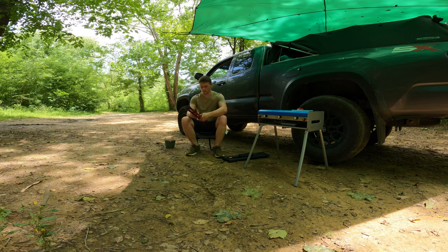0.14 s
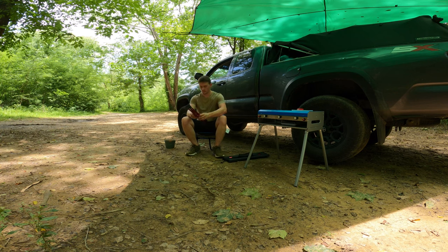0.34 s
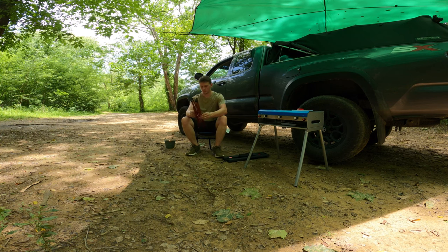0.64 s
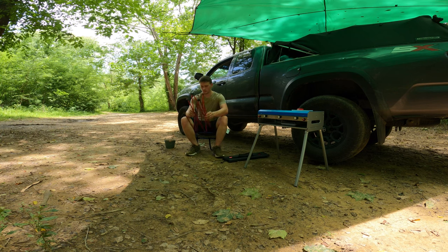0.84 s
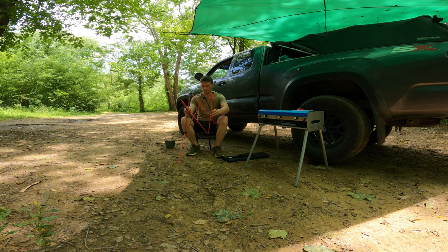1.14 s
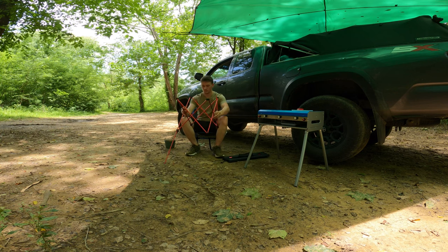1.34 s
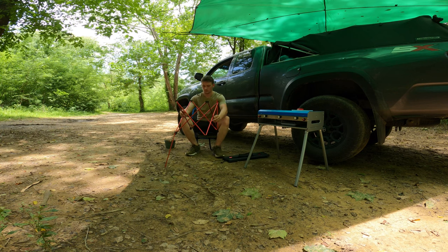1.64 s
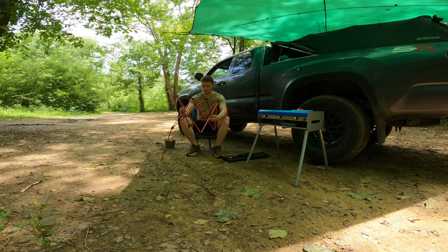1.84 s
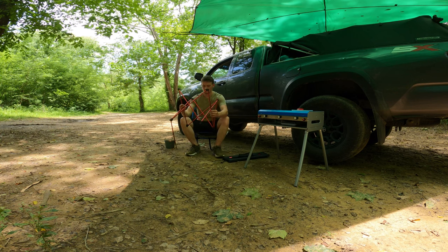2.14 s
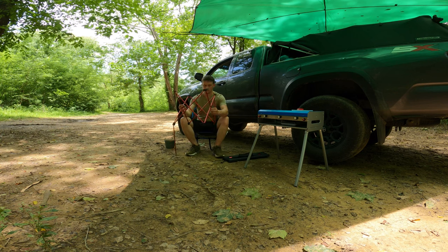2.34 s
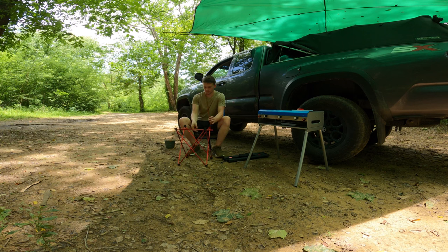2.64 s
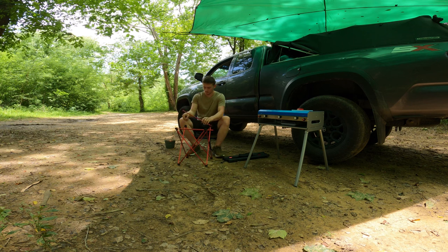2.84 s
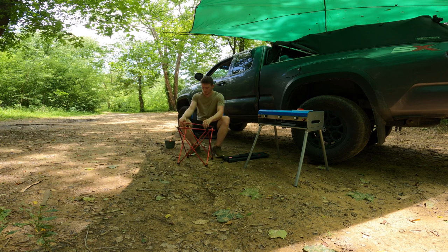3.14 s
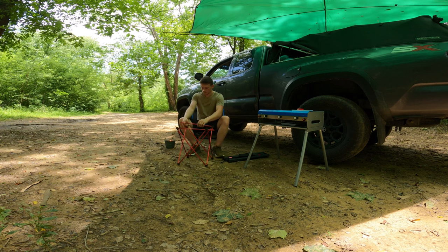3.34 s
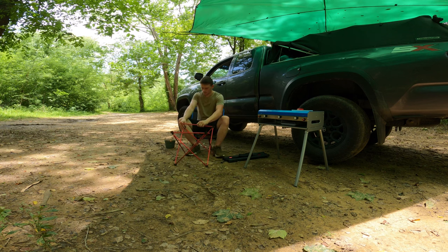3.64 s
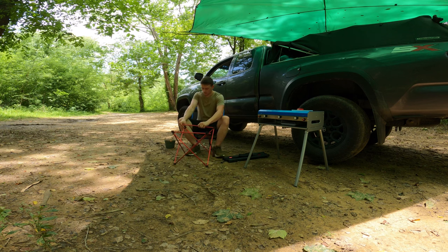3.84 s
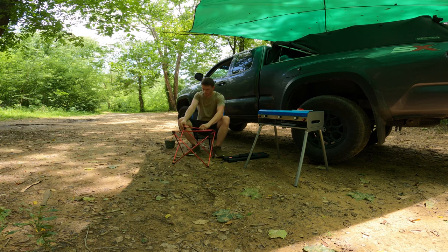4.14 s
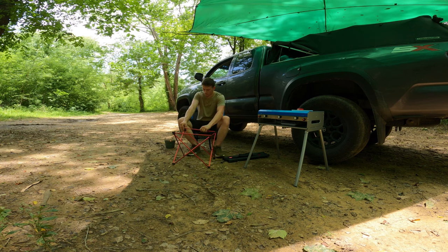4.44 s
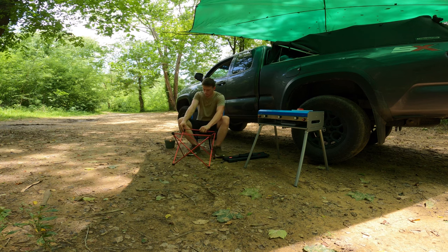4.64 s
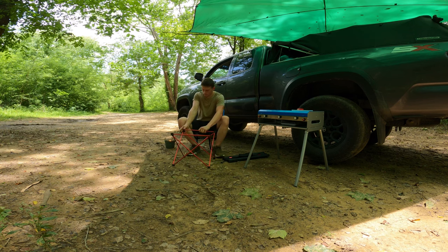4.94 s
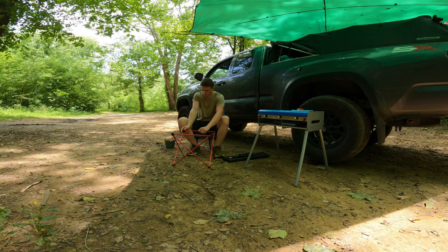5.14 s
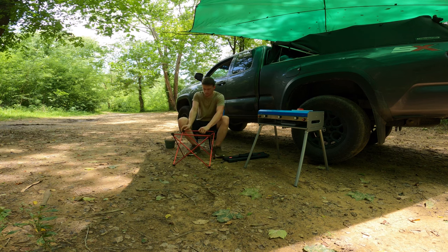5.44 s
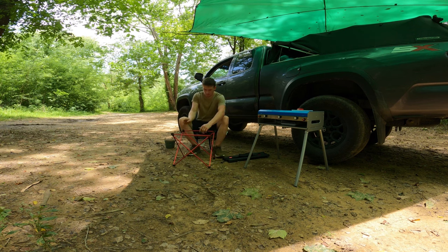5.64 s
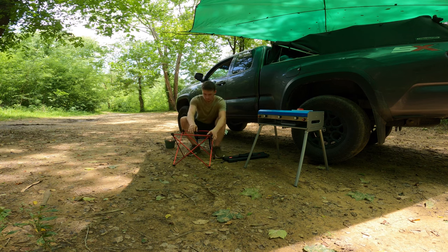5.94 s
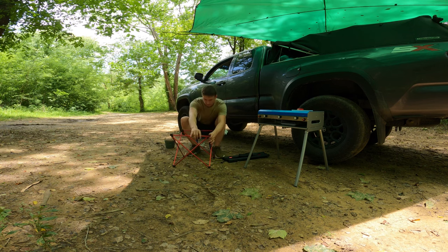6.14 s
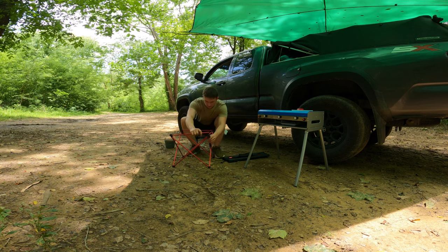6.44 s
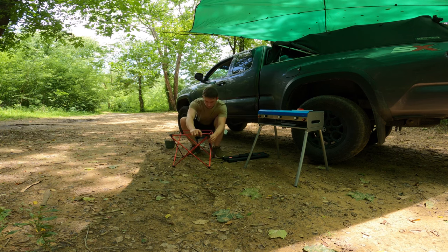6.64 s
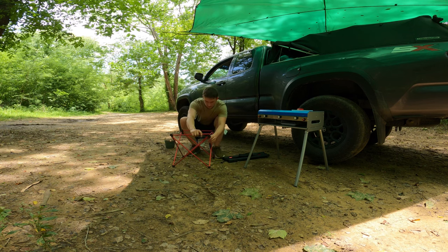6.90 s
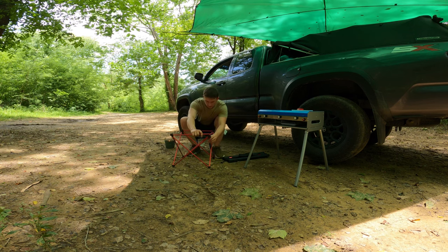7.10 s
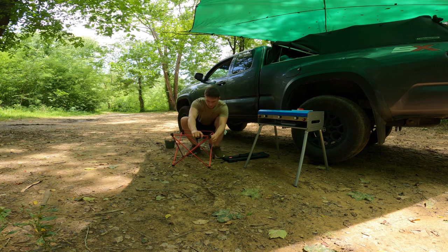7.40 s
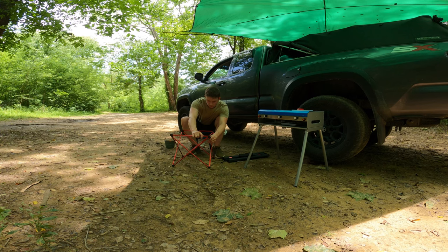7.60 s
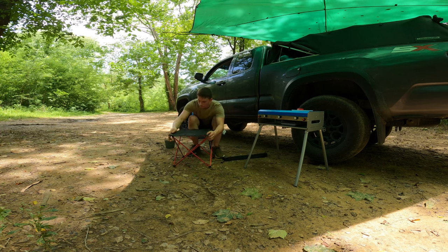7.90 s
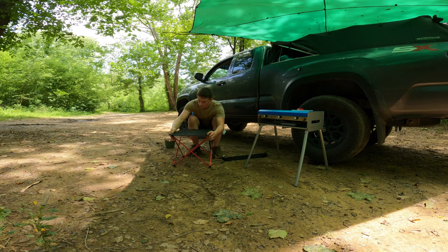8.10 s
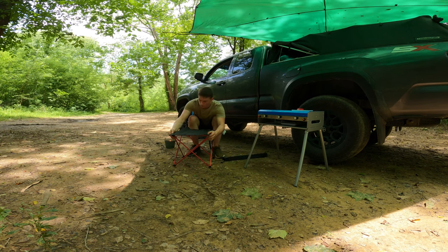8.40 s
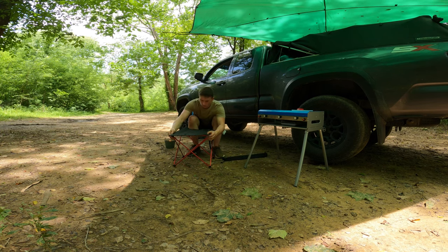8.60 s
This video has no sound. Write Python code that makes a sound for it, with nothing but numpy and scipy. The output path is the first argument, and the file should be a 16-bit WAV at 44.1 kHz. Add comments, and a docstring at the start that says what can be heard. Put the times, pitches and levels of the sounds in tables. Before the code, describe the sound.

Aluminium camp table tubes click and snap together in a quiet woodland clearing, birds whistling far off, ending with a heavy fabric-top snap.

```python
"""Folding table in a forest clearing

A folding table of aluminium tubes is snapped together in a clearing: impacts excite broadband clicks,
a tube chimes in its bending modes, and the top snaps on and shudders. Hands and cloth rub as shaped noise.
A parked truck and the trees return echoes; songbirds whistle far off as gliding sines, and insects drone.
A steady hush and a soft, swelling low rumble, both filtered noise, lie beneath.
"""
import sys
import numpy as np
from scipy import signal
from scipy.fft import rfft, irfft, next_fast_len
from scipy.io import wavfile

SR = 44100
rng = np.random.default_rng(int(sys.argv[2]) if len(sys.argv) > 2 else 0)


def bounce(signal):
    """Save signal as a 16-bit WAV file at the path given by the first command-line argument."""
    frames = np.transpose(np.atleast_2d(signal))
    limited = np.clip(frames, -1, 1)
    pcm = np.round(limited * 32767).astype(np.int16)
    wavfile.write(sys.argv[1], SR, pcm)


N = 386316


def amp(db):
    """Logarithmic level: decibels become a linear amplitude gain."""
    return 10 ** (np.asarray(db) / 20)


def unit(x):
    """Normalisation: scales a signal to a root-mean-square of one."""
    return x / np.sqrt(np.mean(x ** 2) + 1e-20)


def read(points, hz):
    """Interpolation: reads a spectrum table along a logarithmic frequency axis."""
    f, value = np.transpose(points)
    return np.interp(np.log(hz + 1), np.log(f + 1), value)


def level(curve):
    """Envelope: gain at every sample from rows of seconds and dB."""
    return amp(np.interp(np.arange(N) / SR, *np.transpose(curve)))


def add(mix, s, sound):
    """Superposition: adds a sound into the mix from time s in seconds."""
    part = mix[max(round(s * SR), 0):][:len(sound)]
    part += sound[:len(part)]


def tinted(x, colour):
    """Linear filtering: multiplies the spectrum of a signal by the gains of a table."""
    hz = np.fft.rfftfreq(len(x), 1 / SR)
    return irfft(rfft(x) * amp(read(colour, hz)), len(x))


def noise(count, colour):
    """Coloured noise: white noise filtered by a table, at unit rms."""
    return unit(tinted(rng.standard_normal(count), colour))


def wander(count, hz):
    """Low-passed noise: smooth random motion up to about hz."""
    size = next_fast_len(count + 8192)
    lowpass = 1 / (1 + (np.fft.rfftfreq(size, 1 / SR) / hz) ** 4)
    return unit(irfft(rfft(rng.standard_normal(size)) * lowpass, size))[:count]


# Spectrum of the still wood. Each row: frequency in Hz, density in dB per Hz.
AIR_COLOUR = [(15, -41.5), (25, -22.5), (113, -13), (227, -3.5), (848, -9), (919, -12.5), (1240, -8.5),
              (2230, -13.5), (2920, -10), (4040, -18.5), (5730, -19), (8810, -41), (10900, -38),
              (11800, -53.5), (15500, -64)]
# Course of the distant low rumble. Each row: time in seconds, level in dB before rumble_db, centre in Hz.
RUMBLE = [(0.0, -53.5, 250), (0.68, -64, 256.8), (1.29, -52, 220), (1.56, -55, 291), (1.73, -50.5, 258.6),
          (2.49, -57.5, 271.2), (2.95, -52, 261), (3.1, -54, 325), (3.29, -51, 252), (3.56, -46, 249),
          (3.9, -52.5, 229), (4.1, -57, 305.9), (4.61, -63, 271.5), (5.1, -54, 250.4), (5.68, -58, 292.7),
          (5.93, -51, 298.8), (6.69, -47.5, 254), (7.41, -56.5, 319.1), (7.68, -58.5, 227.2),
          (8.24, -59.5, 223.1), (8.51, -60, 305), (8.76, -69, 224.6)]
# Spectrum of the rumble's steady noise. Each row: frequency in Hz, density in dB per Hz.
RUMBLE_COLOUR = [(100, -32), (160, -12.5), (210, 3.5), (260, -1.5), (320, 1.5), (400, -4.5), (500, -14),
                 (750, -24.5), (1500, -72.5)]
# Course of the rumble's deepest part. Each row: time in seconds, level in dB before deep_db.
DEEP = [(0.0, -68), (0.44, -73.5), (1.32, -61.5), (1.93, -63), (2.73, -71.5), (3.56, -56.5), (4.64, -73),
        (5.29, -65), (5.71, -68), (6.07, -66), (6.61, -55), (6.78, -55.5), (7.05, -62), (7.46, -68.5),
        (8.05, -59), (8.76, -62.5)]
# Spectrum of that deepest part. Each row: frequency in Hz, density in dB per Hz.
DEEP_COLOUR = [(20, -36), (45, -8.5), (85, -3), (130, 1), (170, -4), (300, -26), (800, -72.5)]
MOAN_WIDTH_HZ = 120


def background(air_db=-55.12, rumble_db=2.5, deep_db=.5):
    """Narrow-band noise: a steady hush, and a distant rumble whose resonance drifts in pitch and level."""
    air = noise(N, AIR_COLOUR)
    broad = noise(N, RUMBLE_COLOUR)
    deep = noise(N, DEEP_COLOUR)
    s, db, centre = np.transpose(RUMBLE)
    phase = 2 * np.pi * np.cumsum(np.interp(np.arange(N) / SR, s, centre)) / SR
    # two slow random motions in quadrature make a noise band around the drifting centre
    in_phase = wander(N, MOAN_WIDTH_HZ / 2) * np.cos(phase)
    quadrature = wander(N, MOAN_WIDTH_HZ / 2) * np.sin(phase)
    moan = unit(in_phase + quadrature)
    rumble = amp(rumble_db) * level(np.c_[s, db]) * unit(broad + moan)
    return amp(air_db) * air + rumble + amp(deep_db) * level(DEEP) * deep


# Rubs of hands, cloth or feet. Each row: middle in seconds, length in seconds (two standard deviations
# of the swell), level in dB before gain_db, brightness from 0 (cloth) to 1 (scrape).
RUBS = [(0.208, 0.2, -44, .7), (0.86, 0.43, -45.5, 0.55), (1.85, 0.42, -51, 0.43),
        (2.445, 0.022, -30.5, 0.65), (3.26, 0.46, -53, 0.55), (4.282, 0.15, -45.5, 0.74),
        (6.093, 0.33, -48, 0.08), (7.555, 0.23, -49.5, 0.93), (8.027, .12, -47.5, 0.38)]
# Spectrum of a dull swish. Each row: frequency in Hz, density in dB per Hz.
CLOTH_COLOUR = [(500, -29), (1500, -4), (3000, 9), (4000, 3.5), (5000, -20), (7000, -20), (8500, -22.5),
                (15500, -54)]
# Spectrum of a bright scrape. Each row: frequency in Hz, density in dB per Hz.
SCRAPE_COLOUR = [(500, -36.5), (2000, -15), (3500, 4.5), (5500, 6), (7300, -4), (8700, -21), (10500, -20.5),
                 (13000, -22.5), (15500, -43.5)]
FIDGET_DB, FIDGET_BRIGHT = -60.5, 0.27  # faint steady handling: level before gain_db, brightness 0-1


def rustle(flutter_db=2.0, gain_db=-1, scuff_db=-6):
    """Friction noise: rubs swell and fade from dull swish to bright scrape, which catches in little scuffs."""
    t = np.arange(N) / SR
    strokes = [(amp(FIDGET_DB), FIDGET_BRIGHT)]
    for s, length, db, bright in RUBS:
        strokes.append((amp(db) * np.exp(-2 * ((t - s) / length) ** 2), bright))
    # unrelated noises add in power
    dull_power = sum(gain ** 2 * (1 - bright) for gain, bright in strokes)
    bright_power = sum(gain ** 2 * bright for gain, bright in strokes)
    cloth = noise(N, CLOTH_COLOUR)
    scrape = noise(N, SCRAPE_COLOUR)
    # about 35 catches a second, each decaying with a time constant of 7.9 ms
    catches = rng.uniform(0.36, 1, N) * (rng.random(N) < 35 / SR)
    scuffs = unit(signal.lfilter([1], [1, -np.exp(-1 / (0.0079 * SR))], catches))
    rough_scrape = scrape * unit(1 + amp(scuff_db) * scuffs)
    rubbing = np.sqrt(dull_power) * cloth + np.sqrt(bright_power) * rough_scrape
    return amp(gain_db + flutter_db * wander(N, 25)) * rubbing


# Clicks of the joints. Each row: time in seconds, level in dB that scales all four bands,
# heft in dB (extra weight of the low end), edge in dB (treble against the level, before edge_db).
CLICKS = [(0.0964, -19.5, -2, -22.5), (0.2532, -21.5, -15, -22), (0.2842, -23, -2, -21),
          (0.2984, -23.5, -11, -23.5), (.4661, -25, -12, -24.5), (0.5442, -9.5, -11, -18.5),
          (0.5841, -8, -12.5, -20), (0.6062, -21.5, 2, -28), (.7213, -20.5, -7, -25.5),
          (0.7507, -26, -15, -30), (1.086, -28, -5, -34), (1.1096, -16.5, -10, -27), (1.2067, -6, -2, -23),
          (1.2144, -8, -2, -27), (1.3525, -22, -1.5, -25), (1.6162, -14, -0.5, -30),
          (1.769, -23.5, -4, -26.5), (1.9894, -23.5, 1.5, -34), (2.298, -15.5, -4.5, -19),
          (2.6838, -26.5, -2, -29), (2.769, -28.5, -14.5, -26.5), (3.2174, -28.5, -2, -33),
          (3.5177, -29.5, -10, -32), (3.984, -15, 2, -38.5), (4.136, -28, 12, -35),
          (4.1972, -5.5, -0.5, -32), (4.3934, -9.5, 0, -23), (4.4042, -4.5, -5.5, -25),
          (4.5096, -28.5, 12, -23), (5.0207, -26.5, -2.5, -30), (5.0427, -15.5, 1.5, -24),
          (5.0695, -19, 3.5, -31), (5.219, -22.5, 4.5, -42), (5.3362, -7, 4, -33.5),
          (5.3442, -16.5, 0, -39), (6.554, -30.5, 15, -38.5), (6.8553, -19, 1.5, -18.5),
          (7.3317, -9, -0.5, -21), (7.338, -13, -2, -20.5), (7.3708, -11.5, 3, -36), (8.4429, -1, 7.5, -27),
          (8.4836, -25, 18.5, -34), (8.621, -32, 12, -29)]
# Colour of a click within its bands. Each row: frequency in Hz, density in dB per Hz.
JOINT_COLOUR = [(110, -46), (190, -21.5), (323, -10), (519, -23), (748, -16), (1040, -25.5), (1230, -10),
                (1940, -1), (2200, 1.5), (4250, 10.5), (7090, 0.5), (8990, -16.5), (10200, -13.5),
                (13900, -30.5), (15000, -46.5)]
KNOCK_DB, KNOCK_PER_HEFT = -33.5, 1.2  # lowest band against the level, and its rise per dB of heft
CLACK_DB, CLACK_PER_HEFT = -18.5, 1  # second band, likewise
# chatter t60 in seconds at 0 dB level and heft, and its exponential shrinking per dB of level and of heft:
# firm, heavy joints seat sooner
CHATTER_S, SEAT_PER_DB, DAMP_PER_DB = 0.061, 0.013, 0.0285
# attack time constant in seconds at 0 dB, and its exponential growth per dB below: light touches start softly
RISE_S, SOFTER_PER_DB = .0003, 0.0782


def clicks(snap_db=-10, edge_db=4, shake_db=-23, shake_t60=0.2):
    """Impact excitation: a joint grazes, shuts with a crack, chatters, and leaves the frame shaking briefly."""
    out = np.zeros(N)
    t = np.arange(-512, 8192 - 512) / SR  # starts before contact
    hz = np.fft.rfftfreq(8192, 1 / SR)
    # crossfaded bands: knock, clack, snap, edge, each flat between its own corners in Hz
    corners = [900, 1400, 1900, 3000, 6000, 8000]
    band_at_corner = [0, 1, 1, 2, 2, 3]
    bands = [np.interp(hz, corners, share) for share in np.eye(4)[:, band_at_corner]]
    after = np.maximum(t, 0)
    crack = 1.1 * np.exp(-after / .0018)
    graze = .09 * np.exp(-abs(t) / .0025)
    shake = amp(shake_db - 60 * after / shake_t60)
    for s, db, heft, edge in CLICKS:
        # random phases spread the contact into noise
        contact = amp(read(JOINT_COLOUR, hz)) * np.exp(2j * np.pi * rng.random(len(hz)))
        knock_db = KNOCK_DB + KNOCK_PER_HEFT * heft
        clack_db = CLACK_DB + CLACK_PER_HEFT * heft
        gains = amp(db) * amp([knock_db, clack_db, snap_db, edge + edge_db])
        sound = sum(gain * unit(irfft(contact * band)) for gain, band in zip(gains, bands))
        chatter_t60 = CHATTER_S * np.exp(-SEAT_PER_DB * db - DAMP_PER_DB * heft)
        chatter = amp(-4 - 60 * after / chatter_t60 + 2 * wander(len(t), 350))
        rise = 1 - np.exp(-after / (RISE_S * np.exp(-SOFTER_PER_DB * db)))
        add(out, s + t[0], sound * (graze + rise * (crack + chatter + shake)))
    return out


# Decay of the echo among the trees. Each row: frequency in Hz, t60 in seconds before stretching.
WOOD = [(200, 0.46), (700, 0.44), (2000, 0.51), (5000, 0.7), (8000, 0.64), (14000, 0.67)]


def trees(x, build_s, stretch):
    """Scattering reverberation: sparse echoes from trunks and leaves build up, then die band by band."""
    taps = rng.standard_normal(SR) * (rng.random(SR) < .1)
    hz, t, bins = signal.stft(taps, SR, nperseg=256)
    t60 = stretch * read(WOOD, hz)[:, None]
    fade = amp(-60 * t / t60) * (1 - np.exp(-t / build_s))
    tail = signal.istft(bins * fade, SR, nperseg=256)[1]
    return signal.fftconvolve(x, tail / np.linalg.norm(tail))[:N]


# Chimes of a tube. Each row: start in seconds, level in dB, free time in seconds until the joint closes.
CHIMES = [(0.584, -24, 0.046), (2.295, -26.5, 0.016), (2.436, -37.5, 0.046), (4.21, -34, .05),
          (4.368, -29.5, .028), (4.398, -27, .01), (4.403, -6.5, 0.058), (5.043, -35.5, 0.033)]
# Bending modes of the tube. Each row: frequency in Hz, relative level in dB, t60 while free in seconds.
TUBE = [(1922, -25, .2), (2955, -23, .14), (3790, -21, .2), (4337, -11, .17), (5183, -20, .26),
        (5905, -22, .22), (5990, 0, .17), (6808, -16, .16), (7820, -12, .24), (8570, -30, .21),
        (9875, -20, .26), (10470, -34, .14), (11966, -26, .24), (12036, -23, .24), (14360, -40, .12),
        (14700, -42, .12)]
AFTER_DB, AFTER_T60_S = -33.5, .65  # the clamped tube still sings faintly: relative level, decay


def chimes(stop_s=.007, buzz=.3):
    """Modal vibration: a tube rings, buzzing in its socket, until the joint damps it to a faint after-ring."""
    out = np.zeros(N)
    t = np.arange(16384) / SR
    for s, db, free in CHIMES:
        loose = np.exp(-np.maximum(t - free, 0) / stop_s)
        ring = 0
        for hz, mode_db, t60 in TUBE:
            swing = amp(-60 * t / t60) * loose * (1 + buzz * wander(len(t), 200))
            ring += amp(mode_db) * swing * np.sin(2 * np.pi * hz * t + buzz * wander(len(t), 200))
            # the faint ring runs underneath from the start, its modes slightly closer in level
            faint = amp(0.94 * mode_db + AFTER_DB - 60 * t / AFTER_T60_S)
            ring += faint * np.sin(2 * np.pi * hz * t)
        add(out, s, amp(db) * ring * (1 - np.exp(-t / .004)))
    return out


# each glide starts fast and flattens by this exponent; pitch wobble as a share, rising and falling
BEND, SLUR_WAVER, FALL_WAVER = 1.5, 0.0072, .022


def glide(length, start_hz, end_hz):
    """Frequency modulation: one whistled sine, nearly pure when it rises and husky when it falls."""
    u = np.linspace(0, 1, int(length * SR))
    waver = SLUR_WAVER if end_hz > start_hz else FALL_WAVER
    path = end_hz + (start_hz - end_hz) * (1 - u) ** BEND
    hz = path * (1 + waver * wander(8192, 200)[:len(u)])
    swell = signal.windows.tukey(len(u), .25)
    return swell * np.sin(2 * np.pi * np.cumsum(hz) / SR)


# Phrases of one songbird. Each row: start in seconds, end in seconds, first pitch in Hz,
# drop per syllable in Hz, loudest moment in seconds, level there in dB before the direct and echo gains.
PHRASES = [(0.909, 2.35, 6230, 176, 1.99, -34.5), (2.687, 3.45, 5694, 344, 2.8, -40)]
# Whistles outside the repeated syllables: extra notes of the first songbird, then later loose notes.
# Each row: start in seconds, length in seconds, start pitch in Hz, end pitch in Hz,
# level in dB before the direct and echo gains.
WHISTLES = [(1.076, 0.046, 5700, 4200, -49), (1.417, 0.059, 5200, 5330, -44),
            (2.454, 0.041, 3670, 5040, -44), (2.495, .062, 5850, 6000, -51.5),
            (2.537, 0.057, 5400, 4160, -43), (3.653, .044, 5700, 4030, -48),
            (3.842, 0.052, 4600, 4800, -54), (4.064, .06, 3400, 2910, -48),
            (6.407, 0.061, 3410, 4180, -47.5), (6.524, 0.068, 2680, 3006, -49.5),
            (6.958, 0.1, 3930, 4960, -48.5), (7.188, .05, 4430, 3840, -43.5),
            (7.237, 0.085, 4620, 4950, -48.5), (7.484, .09, 5045, 3267, -45.5),
            (7.601, 0.091, 4760, 3105, -46.5), (7.741, 0.054, 3300, 2790, -50)]
SYLLABLE_S, ARCH_DB_PER_S = .314, 11  # syllable spacing; the level sinks either side of the loudest
SLUR_S, SLUR_FROM, SLUR_DB = .085, 0.94, -1.5  # rise to the syllable's pitch, from this share of it
FALL_AFTER_S, FALL_S, FALL_FROM, FALL_TO = .147, .06, .93, .68  # husky drop, in shares of that pitch


def birds():
    """Whistled tones: a bird repeats a slur and a fall, ever lower, with extra notes; loose notes follow."""
    out = np.zeros(N)
    for start, end, first_hz, drop_hz, loudest, db in PHRASES:
        for k, s in enumerate(np.arange(start, end, SYLLABLE_S)):
            hz = first_hz - k * drop_hz
            gain = amp(db - ARCH_DB_PER_S * abs(s - loudest))
            add(out, s, gain * amp(SLUR_DB) * glide(SLUR_S, SLUR_FROM * hz, hz))
            add(out, s + FALL_AFTER_S, gain * glide(FALL_S, FALL_FROM * hz, FALL_TO * hz))
    for s, length, start_hz, end_hz, db in WHISTLES:
        add(out, s, amp(db) * glide(length, start_hz, end_hz))
    return out


# Faint insects far off. Each row: start in seconds, end in seconds, pitch in Hz, level in dB.
INSECTS = [(5.696, 8.76, 5610, -68), (6.401, 7.45, 6230, -73.5)]


def insects():
    """Amplitude modulation: random motion widens a sine into a thin, fuzzy drone that fades in and out."""
    out = np.zeros(N)
    for start, end, hz, db in INSECTS:
        t = np.arange(0, end - start, 1 / SR)
        drone = unit(wander(len(t), 70) * np.sin(2 * np.pi * hz * t))
        add(out, start, amp(db) * drone * signal.windows.tukey(len(t), .3))
    return out


# Spectrum of the shuddering top. Each row: frequency in Hz, density in dB per Hz.
TOP_COLOUR = [(70, -27), (140, -3), (300, -2.5), (600, -3.5), (1000, -4.5), (2000, -0.5), (4500, -1.5),
              (8000, -13), (15000, -50)]
TOP_S, TOP_DB, TOP_T60_S = 8.447, -29.5, 0.5  # start, level, decay


def top():
    """Damped vibration: the stretched fabric top and its frame shudder after it snaps on."""
    out = np.zeros(N)
    t = np.arange(16384) / SR
    add(out, TOP_S, amp(TOP_DB - 60 * t / TOP_T60_S) * noise(len(t), TOP_COLOUR))
    return out


# Single reflections from ground, truck, awning and trunk. Each row: delay in seconds, level in dB.
ECHOES = [(.0021, -24.5), (.0108, -13.5), (.0165, -18.5), (.042, -24)]
# Side level against the middle. Each row: frequency in Hz, side level in dB.
SIDES = [(30, -31), (200, -42), (4000, -49.5), (7000, -33.5), (9500, -11), (13000, -9)]


def scene(click_wet_db=-18, chime_wet_db=-25, bird_dry_db=-6, bird_wet_db=3):
    """Direct-to-reverberant ratio: the near table is mostly direct, the far birds mostly echo."""
    snaps, rings, song = clicks(), chimes(), birds()
    mid = background() + rustle() + snaps + rings + insects() + top()
    for delay, db in ECHOES:
        add(mid, delay, amp(db) * snaps)
    table = amp(click_wet_db) * snaps + amp(chime_wet_db) * rings
    mid += trees(table, build_s=0.011, stretch=.9)
    mid += amp(bird_dry_db) * song
    mid += amp(bird_wet_db) * trees(song, build_s=0.014, stretch=1.3)
    # the side signal is a faint quarter-turned copy of the middle, its level set by frequency
    side = tinted(signal.hilbert(mid).imag, SIDES)
    return np.array([mid + side, mid - side])


# Response of the microphone port. Each row: frequency in Hz, gain in dB.
PORT = [(20, -1.5), (8000, -1), (8950, -3.5), (9700, 1.5), (11000, -3), (12000, -6), (15000, 4)]
EDGE_HZ = 15400  # upper band limit


def record(dry):
    """Transducer response: the port notches the treble, peaks round off smoothly, and the band is limited."""
    heard = np.array([tinted(channel, PORT) for channel in dry])
    rounded = heard / (1 + (heard / .9) ** 6) ** (1 / 6)  # approaches 0.9 of full scale
    lowpass = signal.firwin(255, EDGE_HZ, window=("kaiser", 8), fs=SR)
    return signal.oaconvolve(rounded, lowpass[None], "same")


dry = scene()
out = record(dry)
bounce(out)
```